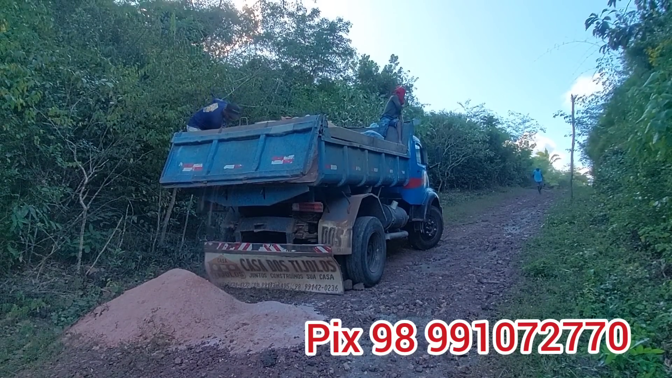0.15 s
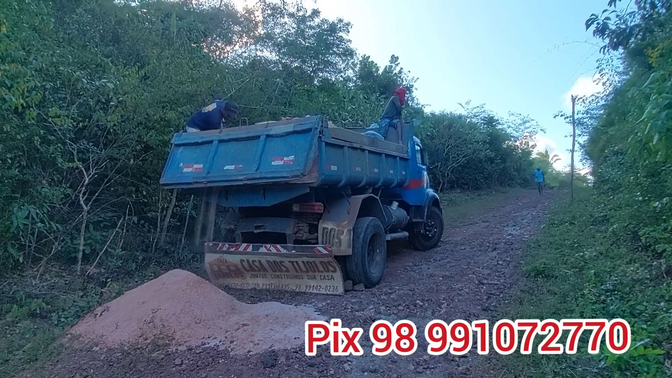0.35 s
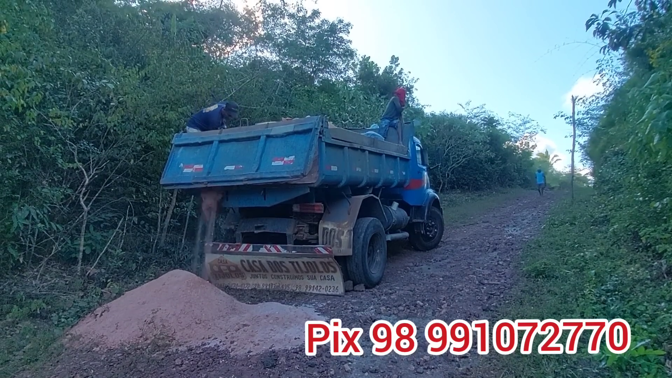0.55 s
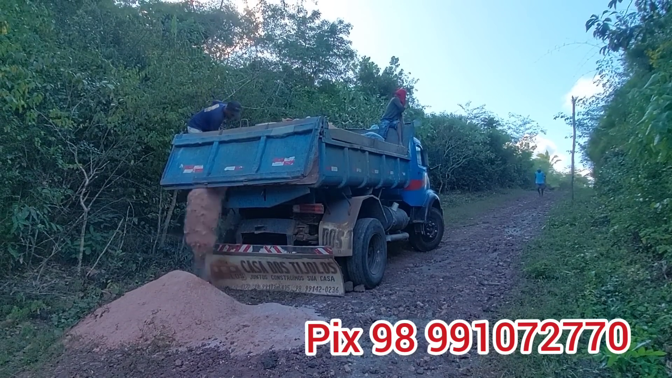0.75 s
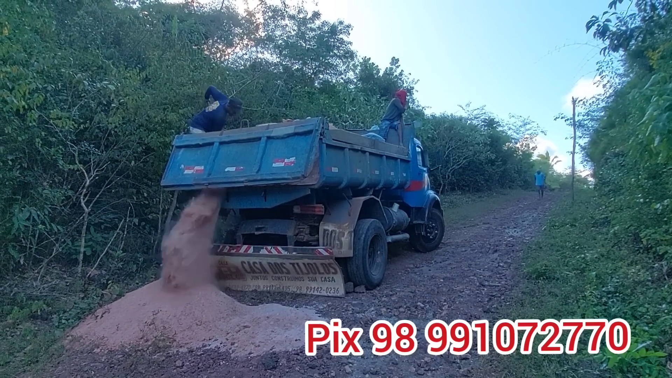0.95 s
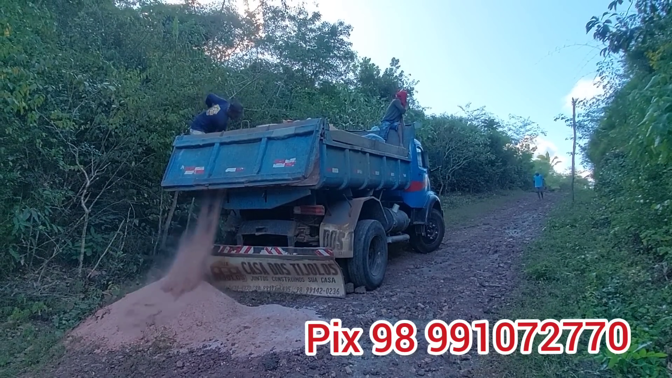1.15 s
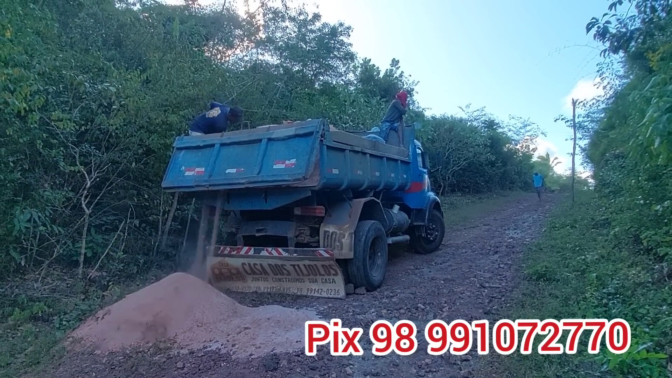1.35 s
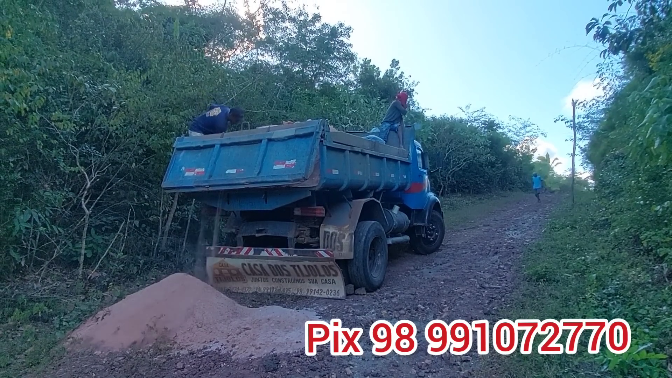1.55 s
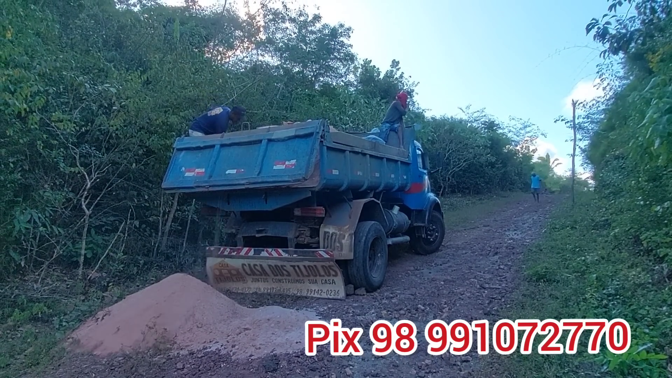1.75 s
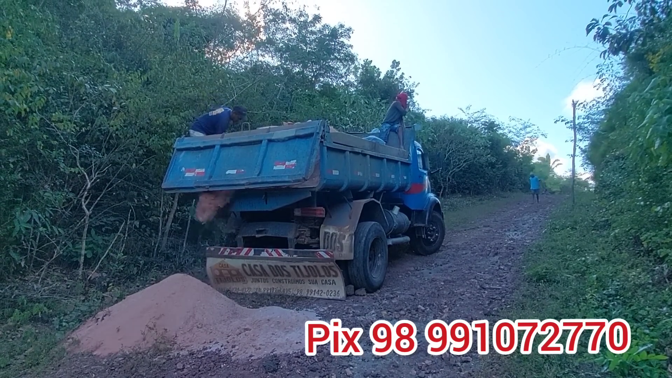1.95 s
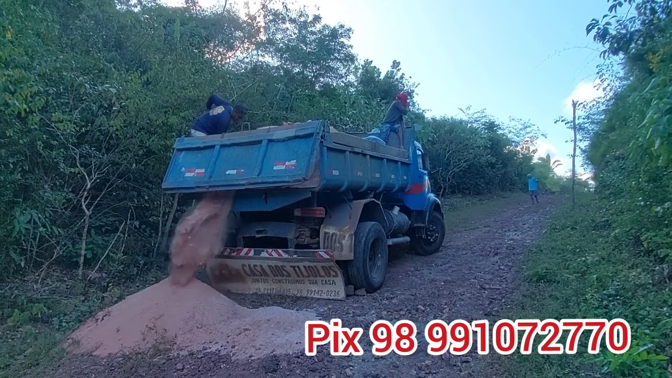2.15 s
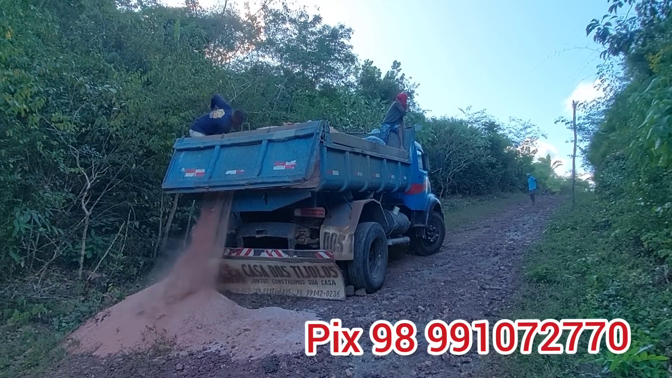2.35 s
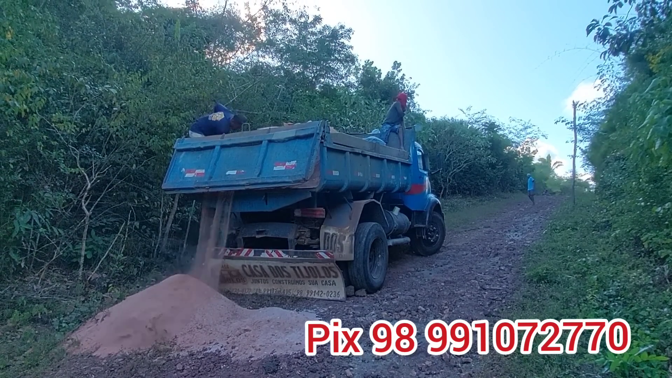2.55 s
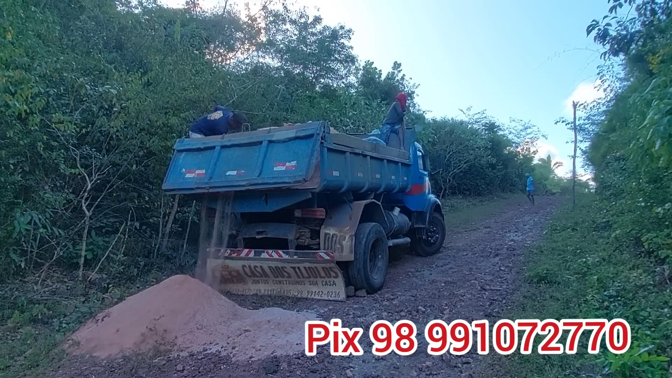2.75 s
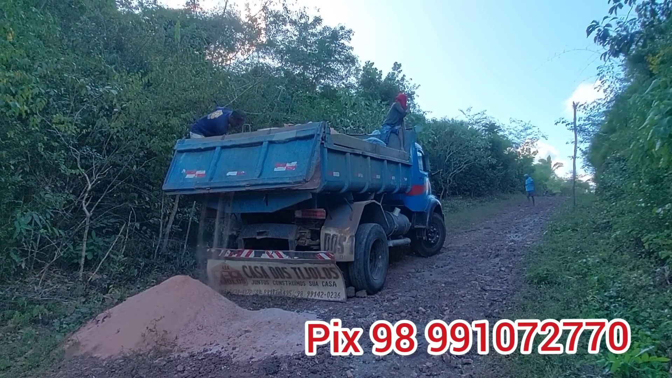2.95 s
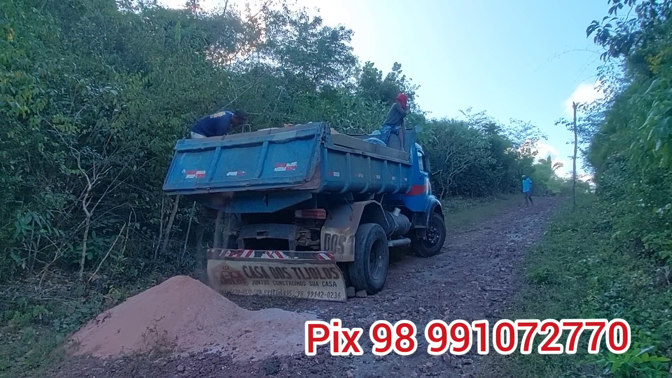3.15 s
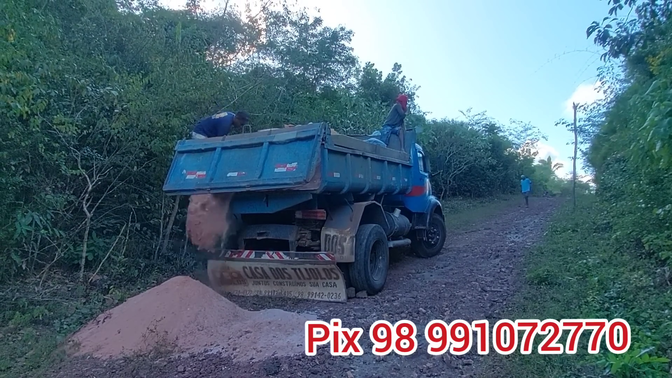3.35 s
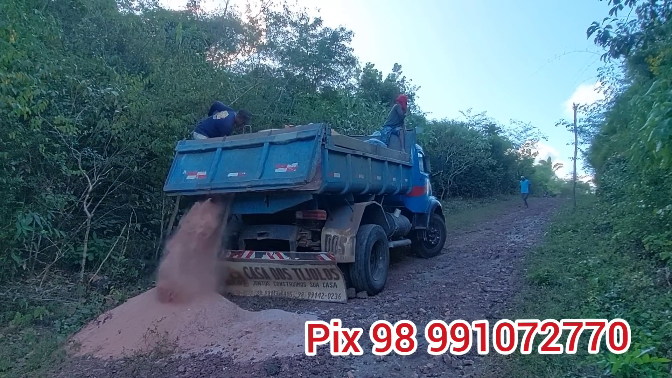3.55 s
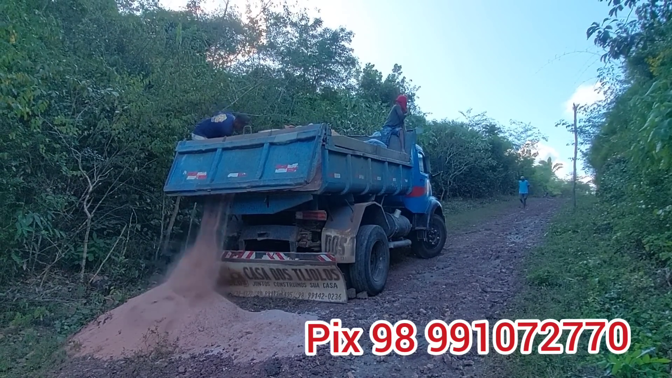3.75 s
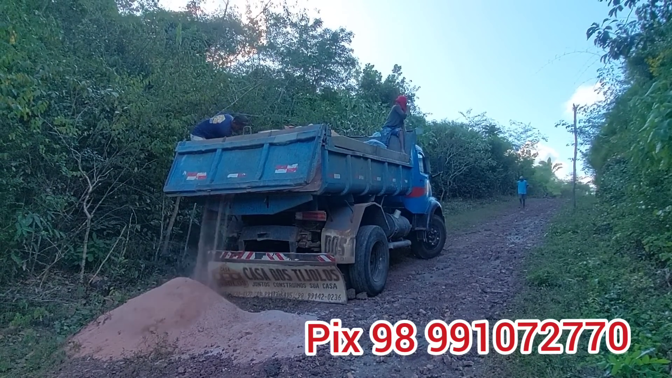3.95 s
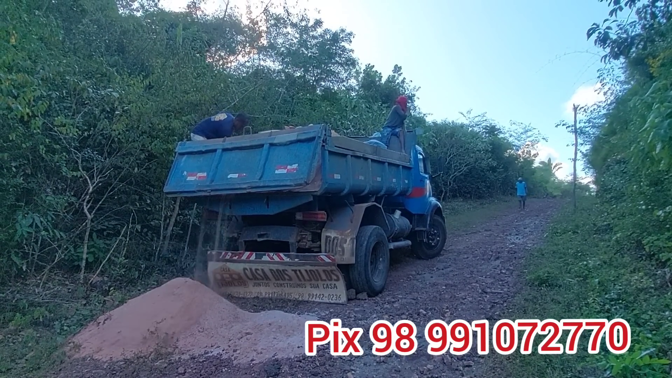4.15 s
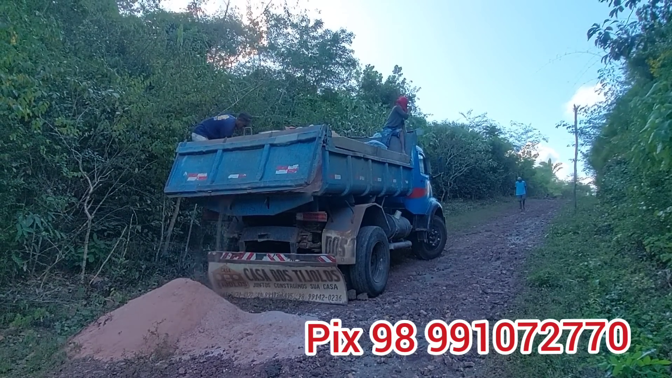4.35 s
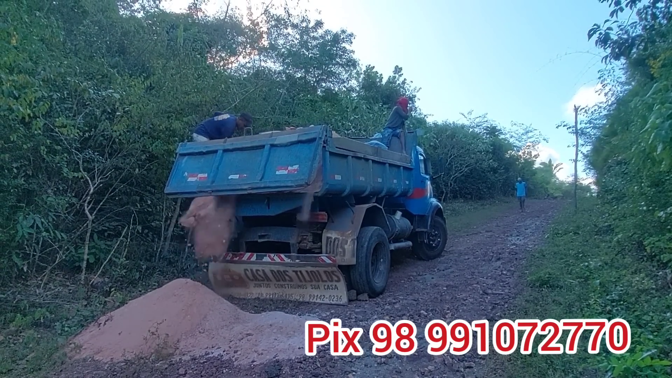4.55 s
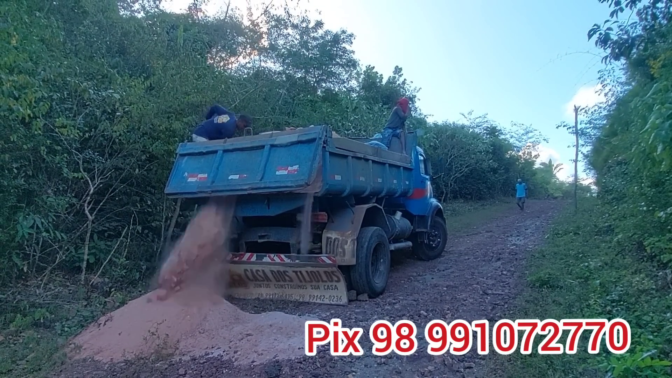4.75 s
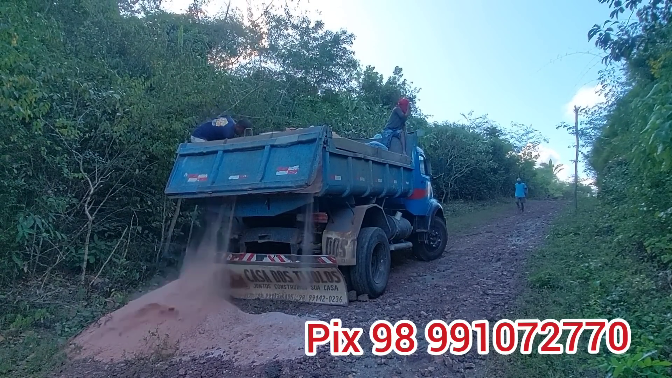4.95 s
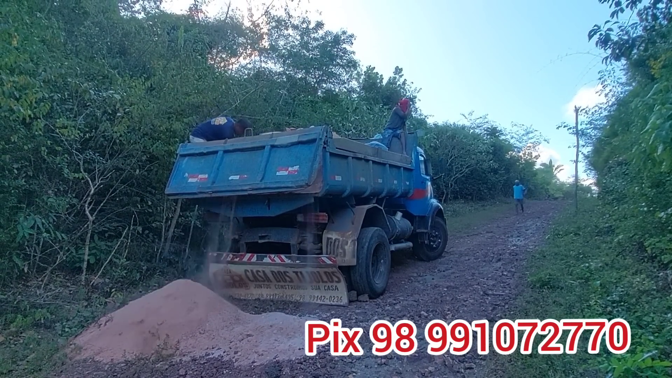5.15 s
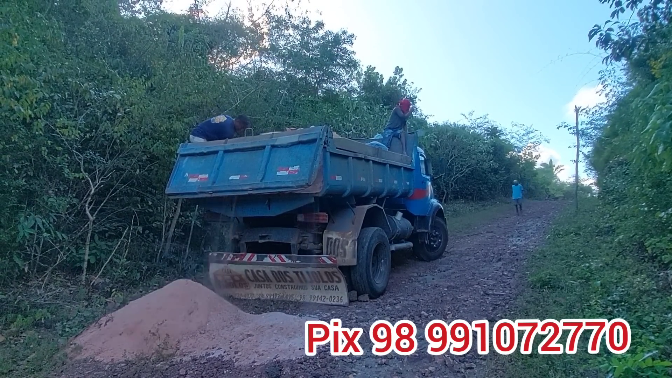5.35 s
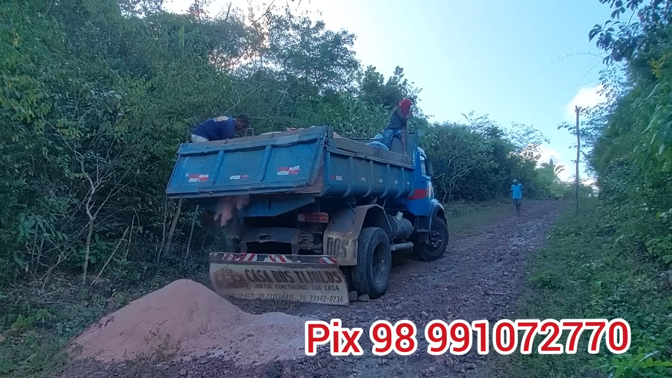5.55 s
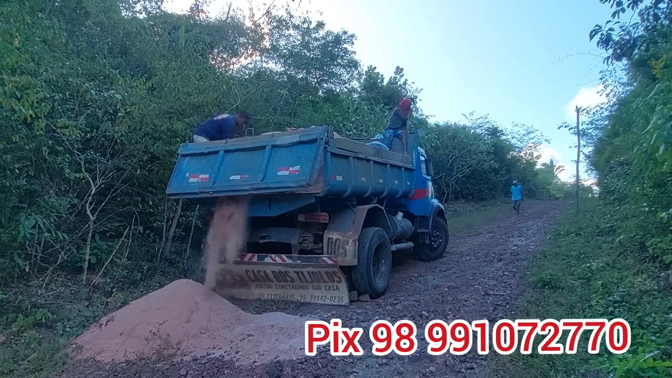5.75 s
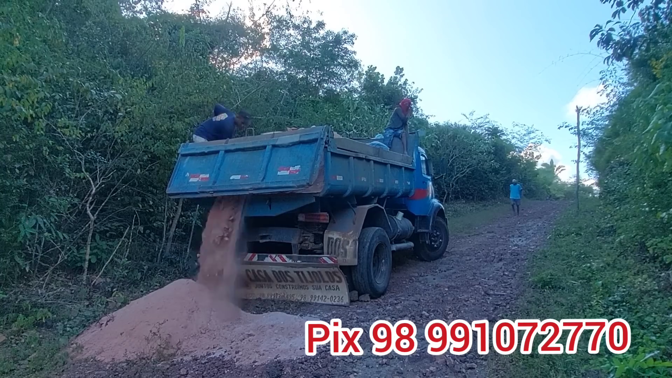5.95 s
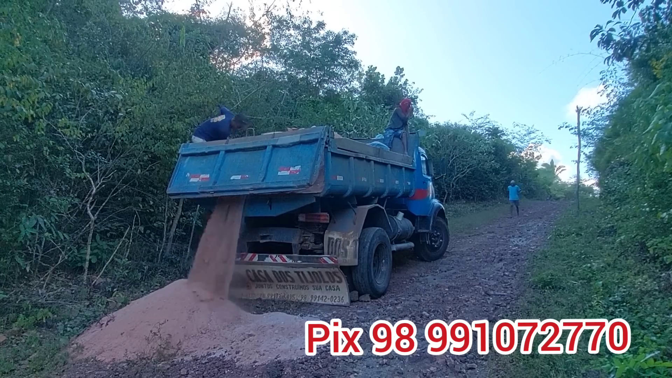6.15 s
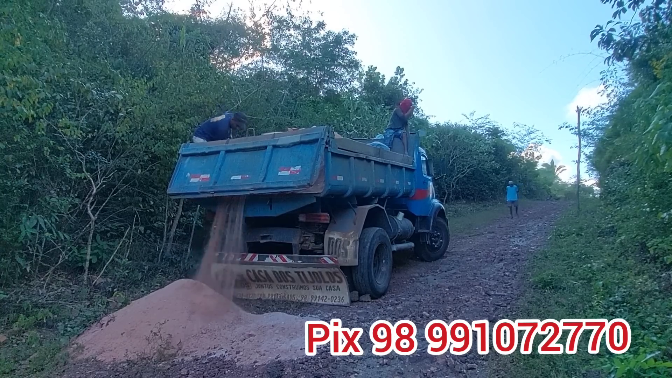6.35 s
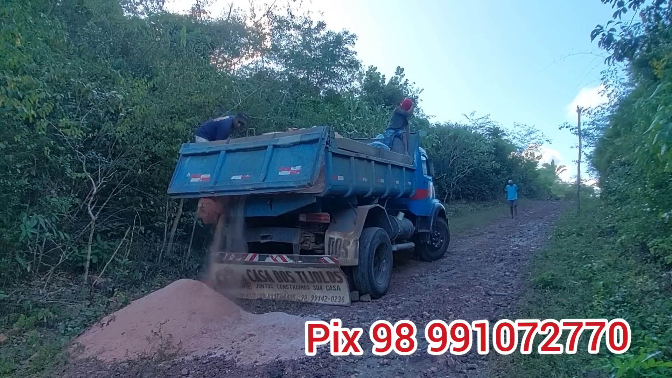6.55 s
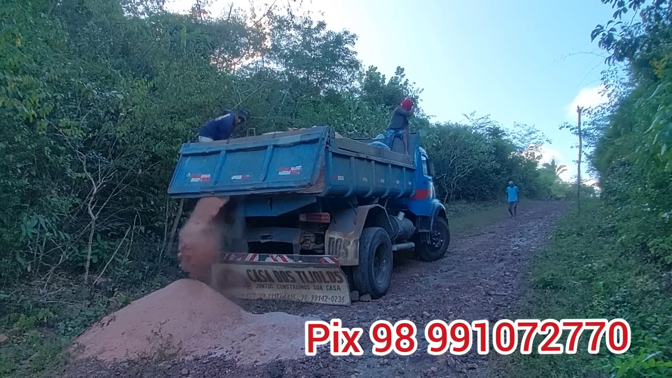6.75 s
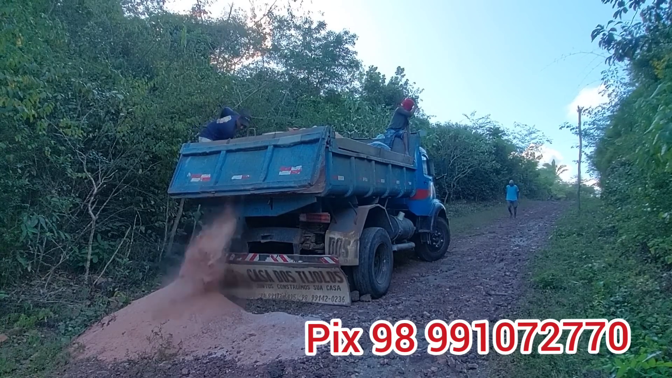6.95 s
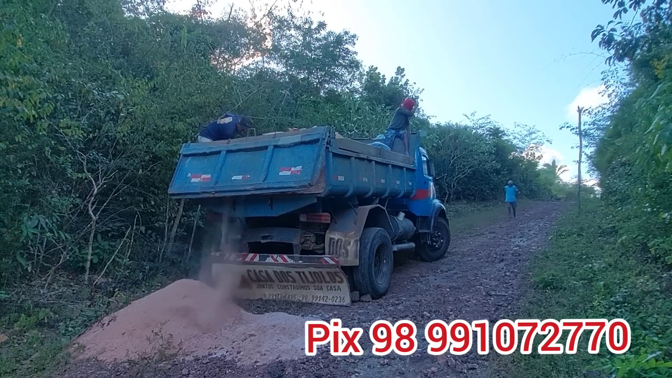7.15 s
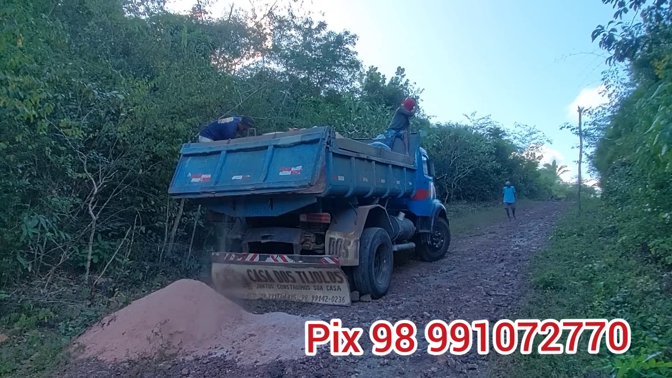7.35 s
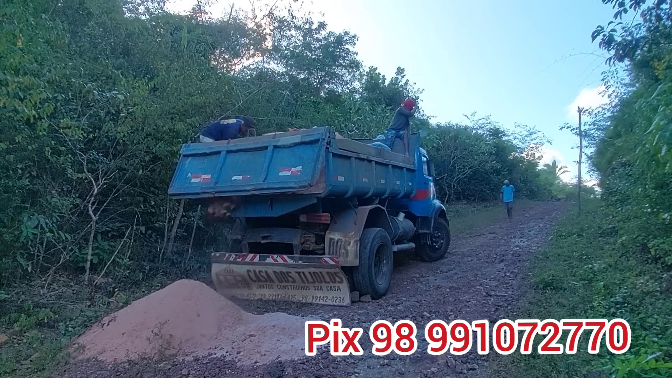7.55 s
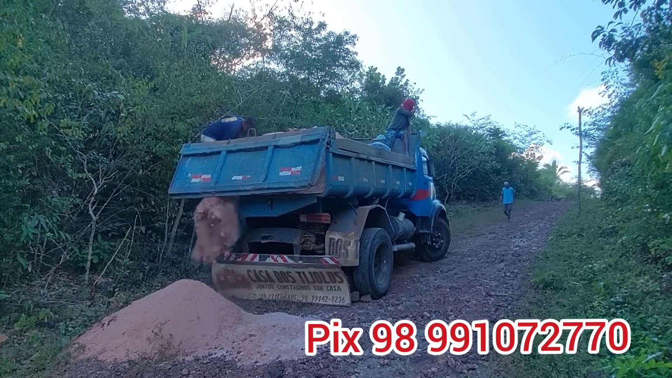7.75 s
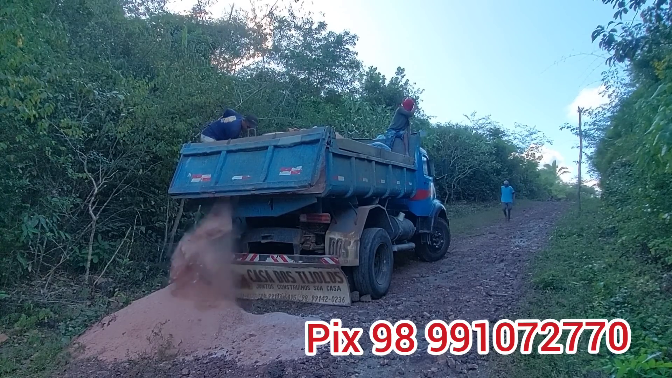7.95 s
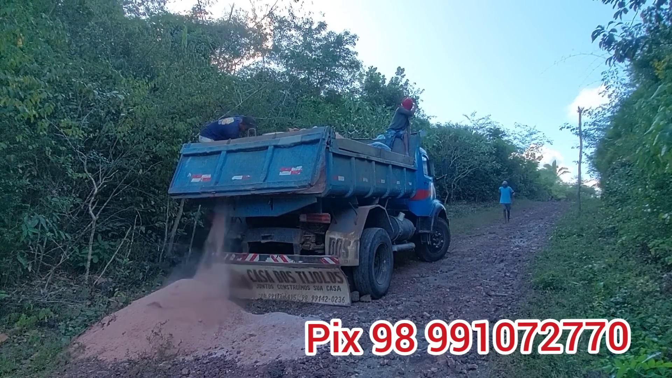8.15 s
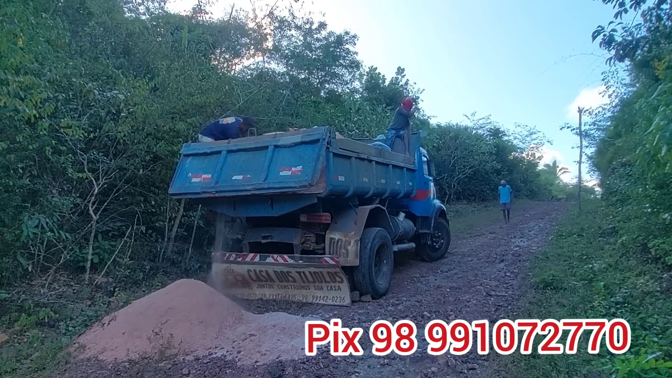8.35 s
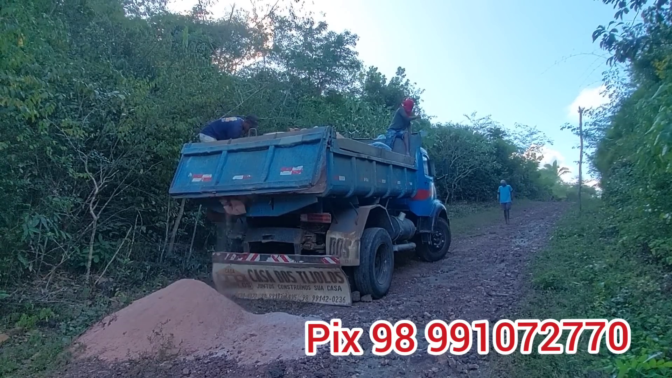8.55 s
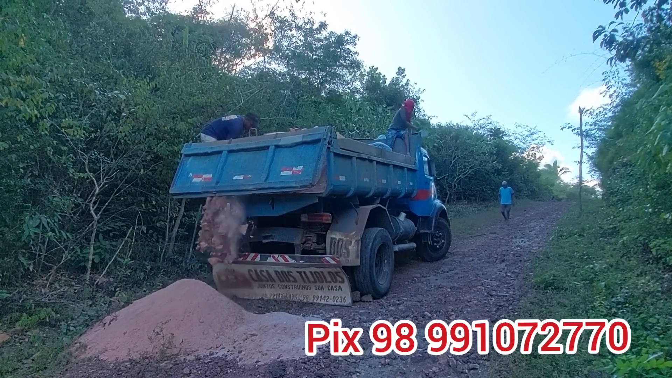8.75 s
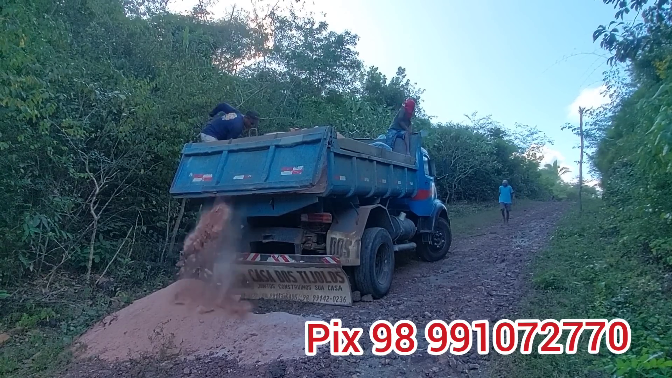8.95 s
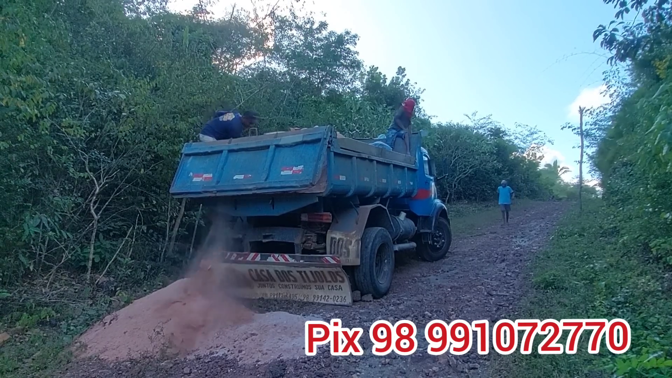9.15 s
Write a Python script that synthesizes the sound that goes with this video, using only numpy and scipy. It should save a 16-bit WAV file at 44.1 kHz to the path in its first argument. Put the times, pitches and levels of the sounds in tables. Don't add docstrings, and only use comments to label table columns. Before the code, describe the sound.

Outdoors by bushes, two shovels work sand off a steel truck bed. About once a second a metallic scrape or knock is followed by a lumpy low thud on the heap and a fine running hiss. Quieter gaps hold small pebble ticks, faint air and a thin high cricket trill. Later strokes grow denser and louder. A small stereo microphone listens from a few metres away.

```python
import sys
import numpy as np
from scipy import signal
from scipy.fft import rfft, irfft, next_fast_len
from scipy.io import wavfile
from scipy.ndimage import uniform_filter1d, map_coordinates

SR = 44100
rng = np.random.default_rng(int(sys.argv[2]) if len(sys.argv) > 2 else 0)


def natural_amplitude(level_db):
    exponent = np.asarray(level_db, float) / 20
    return 10 ** exponent


def unload_audio(sound):
    columns = np.transpose(np.atleast_2d(sound))
    steps = np.round(np.clip(columns, -1, 1) * 32767)
    wavfile.write(sys.argv[1], SR, steps.astype(np.int16))


N = 406602

# (f/Hz, width/Hz, level/dB)
FLOOR_MODES = [(560, 58, -2), (670, 58, 4.5), (720, 185, -1.5)]
# (f/Hz, width/Hz, level/dB)
WALL_MODES = [(1150, 400, -1.5), (1380, 44, 7), (1645, 510, -4.5), (1920, 148, 5), (2063, 390, -1.5)]
# (f/Hz, width/Hz, level/dB)
BLADE_MODES = [(2170, 120, -3.5), (2450, 91, 1.5), (2976, 166, -1), (3550, 310, -4.5), (4000, 230, -3.5),
               (4370, 150, -3.5), (4790, 150, -1), (5200, 124, 0.5), (5370, 180, -1.5), (5830, 240, -1.5),
               (6530, 1900, -11.5)]
# (f/Hz, level per Hz/dB)
GRIT_COLOUR = [(710, -15), (1200, -17), (1370, -11.5), (1560, -8.5), (2270, -3.5), (2560, -7.5),
               (2780, -13.5), (3470, -12), (4080, -4.5), (4700, -6), (6300, -6.5), (8260, -15.5),
               (9820, -10.5), (10500, -8.5), (11600, -2), (14700, -3), (16000, -7)]
# (t/s, peak level/dB, f/Hz, t60/s)
HARD_CLODS = [(0.961, -35, 90, 0.07), (2.554, -46, 150, 0.097), (3.777, -33, 190, 0.03),
              (3.819, -23.5, 292, 0.04), (6.048, -38, 125, 0.095), (6.16, -34, 191, 0.015),
              (7.98, -38.5, 261, 0.057), (8.039, -43, 145, 0.081), (8.193, -40.5, 187, 0.03),
              (8.953, -29, 200, 0.027), (8.993, -28.5, 150, 0.029)]
# (t/s, peak level/dB, ring f/Hz, t60/s, loose grit level/dB)
FLOOR_BLOWS = [(0.816, -51, 655, 0.52, 1), (1.168, -51.5, 690, .14, 4.5), (2.399, -59, 740, .069, -16),
               (2.597, -47, 533, 0.08, -2), (3.734, -39.5, 546, 0.53, -19),
               (4.814, -38.5, 692, 0.14, -15.5), (4.938, -40, 509, 0.32, -6),
               (5.303, -39.5, 560, 0.17, -28), (6.162, -42, 585, 0.2, -31), (6.913, -38, 679, 0.34, -45),
               (6.992, -39, 637, 0.56, -39), (7.181, -33, 575, 0.2, -5), (7.233, -44.5, 590, 0.19, 13),
               (7.321, -31.5, 650, 0.079, -1.5), (7.357, -35, 658, 0.16, -3.5),
               (7.385, -37, 704, 0.19, -15), (8.789, -38.5, 613, 0.078, 1.5), (8.948, -44, 720, .06, -38),
               (8.994, -38.5, 654, 0.057, -47)]
# (t/s, peak level/dB, ring f/Hz, t60/s, loose grit level/dB)
WALL_BLOWS = [(0.594, -56, 1650, 0.13, -39), (0.667, -67, 1900, 0.24, -9), (0.941, -29, 1965, 0.09, -23),
              (2.987, -35.5, 2370, 0.058, -27), (3.382, -35, 2800, 0.069, -2),
              (3.703, -23, 1275, 0.098, -61), (3.945, -41, 1091, 0.15, -37), (4.55, -35.5, 2050, 0.05, -5),
              (4.986, -26, 1470, 0.041, -37), (5.934, -45.5, 2060, 0.15, -32),
              (6.009, -36.5, 1727, 0.15, -13), (6.33, -28, 2480, 0.052, -14),
              (6.333, -28.5, 1050, 0.032, -27), (6.669, -36.5, 2340, 0.06, 0),
              (6.911, -29, 1265, 0.05, -69), (7.785, -53.5, 2940, 0.13, 13.5),
              (7.915, -42.5, 1380, 0.097, 1), (8.192, -26.5, 1240, 0.021, -30),
              (8.194, -24.5, 2370, 0.084, -13), (8.79, -34, 2820, .06, -12),
              (8.703, -33, 1920, 0.16, -20.5)]


def unit(x):
    return x / np.sqrt(np.mean(x ** 2) + 1e-20)


def along(points, hz):
    f, value = np.transpose(points)
    return np.interp(np.log(hz + 1), np.log(f + 1), value)


def wobble(rate):
    knots = rng.standard_normal(int(N * 400 / SR) + 4)
    return map_coordinates(knots, [np.arange(N) * min(rate, 400) / SR])


def filtered(x, response):
    m = next_fast_len(N + SR // 4)
    hz = np.fft.rfftfreq(m, 1 / SR)
    return irfft(rfft(x, m) * response(hz), m)[..., :N]


def modes(table):
    def response(f):
        total = 0
        for k, (centre, width, db) in enumerate(table):
            damping = 1j * f * width
            total = total + (-1) ** k * natural_amplitude(db) * damping / (centre * centre - f * f + damping)
        return total
    return response


def grains(per_s, spread_db, share, patchy_db):
    z = signal.stft(rng.standard_normal((2, N)), nperseg=512)[2]
    patches = uniform_filter1d(rng.standard_normal(z.shape[1:]), size=3, axis=0)
    patches = uniform_filter1d(patches, size=7, axis=1)
    noise = signal.istft(z * natural_amplitude(patchy_db * unit(patches)), nperseg=512)[1][:, :N]
    hits = rng.random(N) < per_s / SR
    size = hits * natural_amplitude(spread_db * np.minimum(rng.exponential(size=N), 2))
    single = size * np.sign(rng.standard_normal((2, N)))
    share = np.clip(share, 0, 1)
    return np.sqrt(1 - share) * unit(noise) + np.sqrt(share) * unit(single)


def dip(depth_db, before_s):
    starts = [round(row[0] * SR) for row in FLOOR_BLOWS + WALL_BLOWS + HARD_CLODS]
    backwards = np.bincount(starts, minlength=N)[::-1]
    near = signal.lfilter([1], [1, -np.exp(-1 / (before_s * SR))], backwards)[::-1]
    return natural_amplitude(-depth_db * np.minimum(near, 1))


def swells(rows, extra_db=0, top=1.105):
    peak_s, db, rise, die = np.transpose(rows)[:4, :, None]
    t = np.arange(0, N + 32, 32) / SR
    before = (peak_s - t) / np.maximum(rise, .01)
    after = (t - peak_s) / np.maximum(die, .01)
    away = np.where(t < peak_s, before, after)
    power = natural_amplitude(db + np.reshape(extra_db, (-1, 1)) - 30 * away ** top) ** 2
    return np.interp(np.arange(N) / SR, t, np.sqrt(power.sum(axis=0)))


def bushes():
    # (f/Hz, level per Hz/dB)
    air_colour = [(15, -55), (25, -0.5), (64, 6), (160, 2), (660, -8), (1070, -14), (1940, -4.5),
                  (2450, -11), (2700, -26), (3400, -13.5), (4500, -12.5), (6800, -8), (8200, -16),
                  (12000, -10.5), (16000, -15)]
    rustle = grains(per_s=25, spread_db=-14, share=0.011, patchy_db=1.5)
    air = unit(filtered(rustle, lambda hz: natural_amplitude(along(air_colour, hz))))
    treble = filtered(air * [[0], [-2.5]], lambda hz: 1 / (1 + (1200 / (hz + 1)) ** 4))
    air = air * [[.85], [3.5]] + treble
    strokes = .3 + .7 * np.cos(np.pi * np.cumsum(80.5 + 1.2 * wobble(2)) / SR) ** 2
    wing_phase = 2 * np.pi * np.cumsum(7730 + 125 * wobble(400)) / SR
    wing = np.sin(wing_phase + np.array([[0], [1.5]]))
    cricket = natural_amplitude(-70.5 + 1.2 * wobble(25)) * strokes * wing
    return natural_amplitude(-69.5 + .3 * wobble(1.07)) * air + cricket


def sand():
    # (peak t/s, level/dB, rise/s, die/s)
    pours = [(0.0, -54.5, .1, 0.1), (0.1, -81, 0.15, 0.39), (.25, -63, 0.67, 0.18),
             (0.72, -50.5, 0.093, 0.27), (.78, -61, .1, 1.2), (1.23, -51.5, 0.17, 0.32),
             (1.4, -62, 0.16, 1.9), (1.7, -59, 1, 0.2), (1.98, -61.5, 0.48, 0.097), (2.44, -50, 0.15, 1.56),
             (2.64, -54, 0.28, 0.93), (3.0, -53, 0.26, 0.12), (3.4, -47.5, 0.24, 0.25),
             (3.48, -51, 0.13, 0.054), (3.75, -42.5, 0.046, 0.24), (3.85, -47, 0.31, 0.14),
             (4.3, -66.5, 1, 0.33), (4.56, -47, 0.26, 0.16), (4.65, -52, 0.17, 0.097),
             (4.75, -63.5, 0.17, 0.73), (5.0, -37.5, 0.14, 0.18), (5.15, -50.5, 0.36, 0.65),
             (5.36, -55.5, 0.93, 0.078), (6.1, -60.5, 0.75, 0.31), (6.22, -48, 0.18, 0.33),
             (6.34, -42.5, 0.13, 0.12), (6.69, -49.5, 0.18, 0.27), (6.8, -52, 0.27, 0.062),
             (7.1, -63, 0.45, .3), (7.2, -40, 0.046, 0.35), (7.38, -35.5, 0.24, 0.092),
             (7.8, -52.5, 0.32, 0.35), (8.22, -37.5, 0.1, 0.15), (8.85, -44.5, 0.3, 0.15),
             (9.22, -42.5, 0.078, .11)]
    stream = natural_amplitude(2.1 * wobble(40)) * grains(per_s=1500, spread_db=4, share=.2, patchy_db=.8)
    hiss = unit(filtered(stream, lambda hz: natural_amplitude(along(GRIT_COLOUR, hz))))
    return dip(depth_db=7.0, before_s=0.15) * natural_amplitude(5.5) * swells(pours) * hiss


def scrape():
    # (peak t/s, level/dB, rise/s, die/s, blade over walls level/dB)
    strokes = [(0.72, -66.5, 0.36, 0.28, 7), (0.853, -47.5, 0.071, 0.12, 9), (3.022, -53, 0.099, 0.079, 4),
               (3.385, -42, 0.067, 0.13, 13.5), (3.36, -49, 0.037, 0.055, 10),
               (3.44, -44.5, 0.063, 0.15, 6), (3.493, -54, 0.1, 0.041, 11.5),
               (5.871, -76, 0.015, 0.13, -14), (6.75, -50.5, 0.11, .1, 8), (6.69, -48.5, 0.057, 0.24, 8.5),
               (6.81, -48.5, 0.21, 0.068, 6), (7.79, -63, 0.13, 0.05, 16), (7.84, -52.5, 0.063, 0.14, 9.5),
               (7.925, -53.5, 0.26, 0.14, 4), (8.81, -61, 0.053, 0.072, 8),
               (8.861, -51.5, 0.21, 0.071, 18.5), (9.22, -42, 0.081, .11, 2)]
    # (peak t/s, level/dB, rise/s, die/s, blade over walls level/dB)
    second_strokes = [
        (4.556, -44, 0.05, 0.097, 11.5),
        (4.6, -47.5, 0.11, 0.12, 4),
        (4.65, -49.5, 0.13, 0.15, 3.5),
        (6.34, -48, 0.26, 0.11, 4.5),
        (7.191, -32.5, 0.04, 0.1, -4),
        (7.245, -38, 0.05, 0.11, -1),
        (7.365, -40.5, 0.071, .08, 3),
        (7.41, -42, 0.18, 0.088, -1),
    ]
    # (peak t/s, level/dB, rise/s, die/s, blade over walls level/dB)
    shoves = [(0.0, -58, 0.11, 0.17, -7), (0.974, -37, 0.067, 0.1, -5), (1.23, -50, 0.35, 0.24, -3.5),
              (2.44, -48, 0.18, 0.23, -4.5), (2.62, -60, 0.39, 0.42, -9), (3.69, -61, 0.036, .04, -4),
              (3.721, -32.5, 0.074, 0.22, -10), (3.8, -47, 0.25, 0.25, 1), (3.952, -62, 0.064, 0.2, -17),
              (4.832, -42, 0.04, 0.52, -7.5), (4.995, -40, 0.14, 0.16, 1.5), (5.13, -50.5, 0.11, 0.1, 6),
              (5.325, -47, 0.061, 0.11, -13.5), (6.055, -41.5, 0.1, 0.17, -10.5),
              (6.24, -51, 0.72, 0.27, -5), (6.935, -39.5, 0.049, 0.14, -16),
              (7.02, -41.5, 0.052, 0.097, -8.5), (7.33, -37, 0.075, 0.11, -13),
              (7.99, -58.5, 0.059, 0.2, -13), (8.213, -42, 0.11, 0.18, 0), (8.285, -46.5, 0.091, 0.037, -3),
              (8.72, -41, 0.031, 0.36, -9), (8.96, -48, 0.1, 0.061, -11)]
    # (peak t/s, level/dB, rise/s, die/s)
    trickles = [(.28, -67, 0.2, 0.2), (.62, -62, 0.027, 0.34), (.76, -61, .3, 0.17),
                (1.08, -59, 0.13, 0.17), (3.27, -64.5, 0.12, 0.17), (4.22, -72, 0.17, 0.28),
                (4.45, -63, 0.11, .1), (4.74, -63, 0.074, 0.17), (7.52, -65, .1, 0.15),
                (8.14, -53.5, 0.15, 0.11), (8.38, -65, 0.081, 0.32), (9.02, -67, 0.054, 0.27)]
    # (f/Hz, width/Hz, level/dB)
    second_modes = [(2064, 80, 2), (2480, 270, -3.5), (3060, 420, -4.5), (3750, 420, -2.5),
                    (4510, 200, -4.5), (4940, 110, -2.5), (5110, 140, -5.5), (5445, 120, -1.5),
                    (5910, 160, -2), (6020, 200, -6), (7300, 1100, -11)]

    rows = strokes + second_strokes + shoves
    sing_db = np.transpose(rows)[-1]
    first = np.arange(len(rows)) < len(strokes)

    def held(trim_db):
        return swells(rows, trim_db, top=1.14)

    floor_gain = held(-4 - 0.25 * sing_db)
    first_gain = held(np.where(first, sing_db - 4.0, -np.inf))
    second_gain = held(np.where(first, -np.inf, sing_db - 1.0))
    parts = (  # (modes, low edge/Hz, high edge/Hz, gain)
        (FLOOR_MODES, 500, 1000, floor_gain),
        (WALL_MODES, 850, 3500, held(-0.67)),
        (WALL_MODES, 1600, 2550, swells(trickles, -1.3)),
        (BLADE_MODES, 2000, 7000, first_gain),
        (second_modes, 1900, 7500, second_gain))
    slip, out = wobble(70), 0
    for table, low_hz, high_hz, gain in parts:
        drive = natural_amplitude(1.25 * slip) * grains(per_s=700, spread_db=5.5, share=0.2, patchy_db=3)
        body = lambda hz: modes(table)(hz) / (1 + (low_hz / (hz + 1)) ** 6) / (1 + (hz / high_hz) ** 6)
        out = out + gain * unit(filtered(drive, body))
    return dip(depth_db=6.0, before_s=0.07) * out


def heap():
    # (peak t/s, level/dB, rise/s, die/s,
    # hollow over deep level/dB)
    landings = [(0.0, -70.5, .1, 0.42, 5), (0.965, -39, 0.059, 0.33, -5), (1.23, -39, 0.23, 0.17, -6),
                (2.34, -45.5, 0.11, 0.3, -19), (2.45, -40, 0.23, 0.19, -9.5), (2.579, -48.5, 0.071, 0.23, -5),
                (2.84, -65, 0.12, 0.21, 2.5), (3.071, -74, 0.37, 0.34, 4.5), (3.6, -47, 0.045, 0.39, -27),
                (3.78, -38.5, 0.22, 0.27, -4.5), (4.85, -44, 0.055, 0.19, 0.5), (4.999, -38, 0.26, 0.19, -3.5),
                (5.32, -55, 0.019, 0.13, 7.5), (6.03, -44, 0.028, 0.34, 2.5), (6.19, -42.5, 0.31, 0.38, -21),
                (6.37, -52, 0.78, 0.14, -1.5), (6.93, -42, 0.023, 0.26, -7.5), (7.04, -47.5, 0.15, 0.17, 6),
                (7.22, -47, 0.45, 0.35, -27), (7.39, -48, 0.24, 0.13, 3.5), (7.98, -56, 0.15, 0.69, -12),
                (8.22, -41.5, 0.17, 0.14, -3), (8.73, -50.5, 0.036, 0.43, 2.5), (8.959, -40, 0.041, 0.26, -7),
                (9.22, -38.5, 0.16, .11, -10),
                (0.02, -63, .1, .15, -17), (.28, -76.5, 0.25, 0.19, 14), (.69, -80, 0.093, 0.22, 14),
              (0.8, -79, 0.34, 0.18, 16), (1.58, -66.5, 0.055, .1, -12), (4.2, -80, 0.16, 0.26, -20),
              (4.89, -42, 0.088, .1, -12), (7.78, -67, 0.17, 0.11, -23), (8.12, -49, 0.11, .08, -5),
              (4.0, -56.5, 0.07, 0.14, -14), (6.69, -60.5, 0.12, 0.12, -9), (8.55, -66, 0.36, 0.13, -36)]
    # (t/s, peak level/dB, f/Hz, t60/s)
    soft_clods = [(1.006, -39, 198, .04), (1.198, -31, 184, 0.093), (1.245, -32, 171, 0.057),
                  (2.251, -51.5, 180, 0.11), (2.291, -52, 140, .06), (2.325, -44, 170, .06),
                  (2.365, -43, 60, .1), (2.403, -33.5, 189, 0.046), (2.43, -39, 250, .04),
                  (2.452, -39, 70, .07), (2.575, -38, 125, 0.081), (6.255, -38, 202, .05),
                  (2.447, -30, 200, 0.046), (3.59, -41.5, 180, 0.054), (3.723, -26.5, 154, 0.058),
                  (3.764, -32, 110, 0.027), (3.831, -30, 130, 0.037), (3.848, -30, 152, 0.067),
                  (3.874, -36, 200, .04), (3.985, -45, 64, .2), (4.841, -35, 304, 0.095),
                  (4.944, -42, 250, .04), (4.953, -29, 190, .05), (4.993, -23.5, 200, 0.045),
                  (5.055, -38, 230, .06), (6.035, -35, 292, 0.042), (7.125, -42, 151, 0.044),
                  (7.14, -38, 121, 0.048), (8.118, -51, 153, 0.046), (8.172, -31, 130, 0.048),
                  (8.184, -43, 90, .04), (8.212, -38, 205, 0.037), (8.722, -36, 246, 0.055),
                  (8.944, -36, 152.1, 0.039), (8.962, -32, 70, .09), (9.186, -36, 150, 0.046)]
    # (f/Hz, width/Hz, level/dB)
    ground_modes = [(57, 14, -1), (130, 23.4, -1), (184.7, 107.5, -1), (239.4, 149, -5)]
    # (f/Hz, width/Hz, level/dB)
    hollow_modes = [(307, 31, 0.5), (401, 140, -9.5), (547, 61, -5)]

    def body(table):
        return lambda hz: modes(table)(hz) / (1 + (35 / (hz + 1)) ** 4) / (1 + (hz / 900) ** 2)

    deep = filtered(grains(per_s=400, spread_db=4.5, share=0.14, patchy_db=2.5), body(ground_modes))
    hollow = filtered(grains(per_s=400, spread_db=2.5, share=0.25, patchy_db=4.5), body(hollow_modes))
    falls = landings
    hollow_db = np.transpose(falls)[-1] - 1.5
    rumble = swells(falls) * unit(deep) + swells(falls, hollow_db) * unit(hollow)

    bumps, t = np.zeros((2, N + SR)), np.arange(SR // 8) / SR
    click = natural_amplitude(-60 * t / 0.031) * np.sin(2 * np.pi * 630 * t)
    for k, (s, db, hz, t60) in enumerate(HARD_CLODS + soft_clods):
        hardness = 1.03 if k < len(HARD_CLODS) else .35
        push = np.sin(2 * np.pi * hz * t + [[0], [np.pi / 2]]) + hardness * click
        fade = natural_amplitude(db - 1.0 - 60 * t / max(t60, .01)) * (1 - np.exp(-t / 0.00067))
        bumps[:, round(s * SR):][:, :len(t)] += fade * push
    return dip(depth_db=1.0, before_s=0.16) * rumble + bumps[:, :N]


def knocks():
    ring, shake = np.zeros((2, N + SR)), np.zeros((3, 2, N + SR))
    t = np.arange(SR // 4) / SR
    for s, db, hz, t60, grit_db in sorted(FLOOR_BLOWS + WALL_BLOWS):
        at = slice(round(s * SR), round(s * SR) + len(t))
        fade = natural_amplitude(db - 60 * t / max(t60, .01)) * (1 - np.exp(-t / 0.001))
        drift = 0.062 * np.cumsum(rng.standard_normal((2, len(t))), axis=1)
        ring[:, at] += natural_amplitude(-3.5) * fade * np.sin(2 * np.pi * hz * t + drift)
        blade_db = -10.5 + 0.49 * grit_db + 7.5
        levels = natural_amplitude([[[-9]], [[blade_db]], [[grit_db - 2.5]]])
        shake[..., at] += levels * fade * rng.standard_normal((3, 2, len(t)))
    colours = (modes(FLOOR_MODES + WALL_MODES), modes(BLADE_MODES),
               lambda hz: natural_amplitude(along(GRIT_COLOUR, hz)))
    hz = np.linspace(1, SR / 2, num=2000)
    out = ring[:, :N]
    for burst, colour in zip(shake, colours):
        power = np.mean(np.abs(colour(hz)) ** 2)
        out = out + filtered(burst[:, :N], colour) / np.sqrt(power)
    return out


def pebbles():
    # (t/s, peak level/dB, f/Hz)
    ticks = [(1.4564, -55, 9100), (1.55, -51, 4470), (1.6014, -48, 12100), (1.6214, -51, 11500),
             (1.752, -48, 11850), (1.8897, -55, 4790), (1.942, -50, 14600), (1.945, -67, 550),
             (2.42, -50, 14000), (2.6494, -44, 13700), (2.6794, -41, 11400), (2.7678, -50, 2020),
             (4.171, -58, 1930), (4.169, -72, 1150), (4.2, -63, 1350), (4.203, -62, 1950),
             (4.222, -65, 1350), (4.243, -52, 1800), (4.244, -60, 1360), (4.266, -63, 1840),
             (4.44, -63, 1480), (4.449, -55, 2100), (4.535, -39, 5100), (4.763, -44, 12600),
             (4.7628, -56, 6350), (5.2675, -45, 4600), (5.287, -46, 3830), (5.8461, -56, 12400),
             (5.87, -57, 694), (5.891, -58, 10500), (6.179, -43, 12200), (6.738, -50, 2390),
             (7.612, -58, 10370), (7.828, -43, 5450), (8.1793, -51, 11300), (9.046, -59, 514),
             (9.142, -71, 530)]
    out, t = np.zeros((2, N + SR)), np.arange(SR // 40) / SR
    for s, db, hz in ticks:
        smooth = round(SR / min(hz / 4, 2200) * (1 + (hz < 3000)))
        burst = unit(uniform_filter1d(rng.standard_normal((2, len(t))), size=smooth, axis=1))
        tick = (.3 + .6 * natural_amplitude(-60 * t / .03) * burst) * np.sin(2 * np.pi * hz * t)
        out[:, round(s * SR):][:, :len(t)] += natural_amplitude(db + 7.5 - 60 * t / (0.042 + 30 / hz)) * tick
    return out[:, :N]


def scene():
    return bushes() + sand() + scrape() + heap() + knocks() + pebbles()


def top_cut(x):
    return signal.sosfilt(signal.butter(12, 16590, fs=SR, output="sos"), x)


def record(dry):
    # (f/Hz, correlation)
    likeness = [(60, .95), (170, .99), (350, .93), (600, .95), (1000, .75), (1600, .55), (2100, .3),
                (3500, .35), (15000, .2)]
    # (f/Hz, phase/rad)
    left_lead = [(100, 0), (200, .05), (350, .35), (700, .35), (1200, 1), (1450, 1.5), (1700, 2.8),
                 (3500, 8.5), (16000, 50)]
    # (f/Hz, left minus right level/dB)
    body_shade = [(300, .2), (1000, -2.5), (1900, -7), (3000, 0), (4500, 0), (6000, -3), (7100, 2.5),
                  (8600, 1), (9200, -5), (11200, -12), (14000, -7), (15700, -3)]
    turn = lambda hz: np.arccos(np.clip(along(likeness, hz), 0, 1)) / 2
    direct, scattered = filtered(dry, lambda hz: np.array([np.cos(turn(hz)), np.sin(turn(hz))]))

    def ports(hz):
        lead = np.exp(.5j * np.interp(hz, *np.transpose(left_lead)))
        left = lead * natural_amplitude(along(body_shade, hz) / 2)
        return np.array([left, 1 / left]) * (hz < 15820)

    mix = filtered(np.array([direct + scattered, direct - scattered]), ports)
    return top_cut(mix)


dry = scene()
out = record(dry)
unload_audio(out)
```